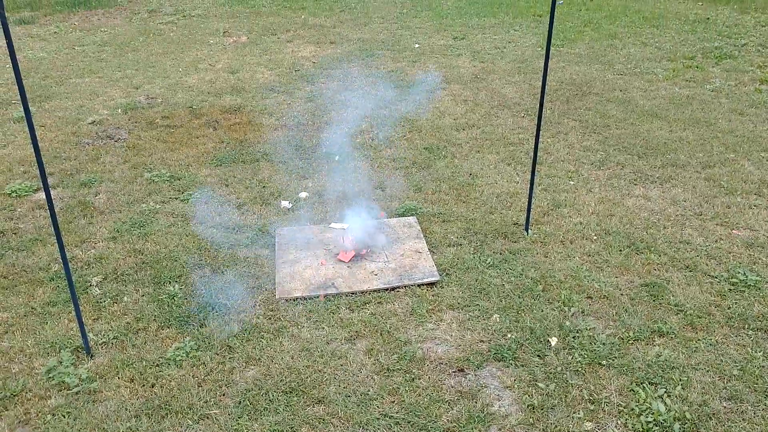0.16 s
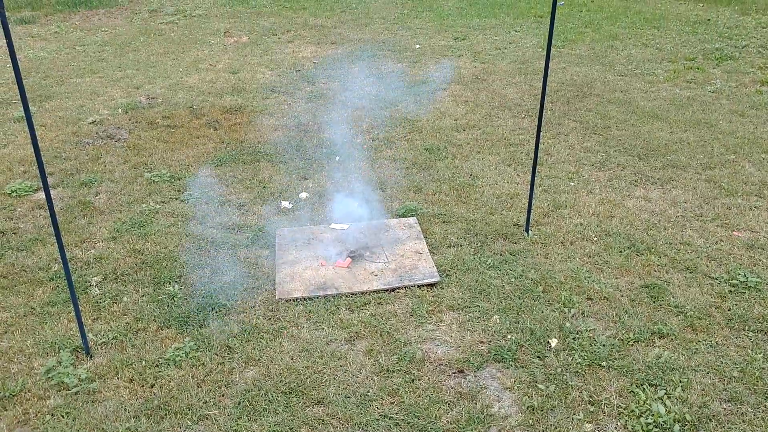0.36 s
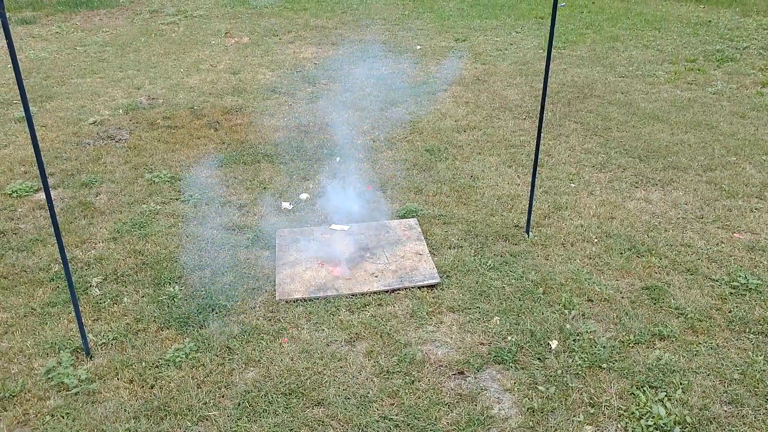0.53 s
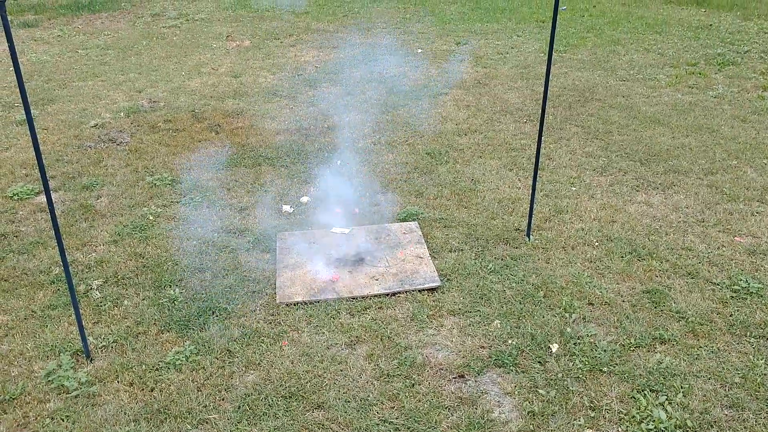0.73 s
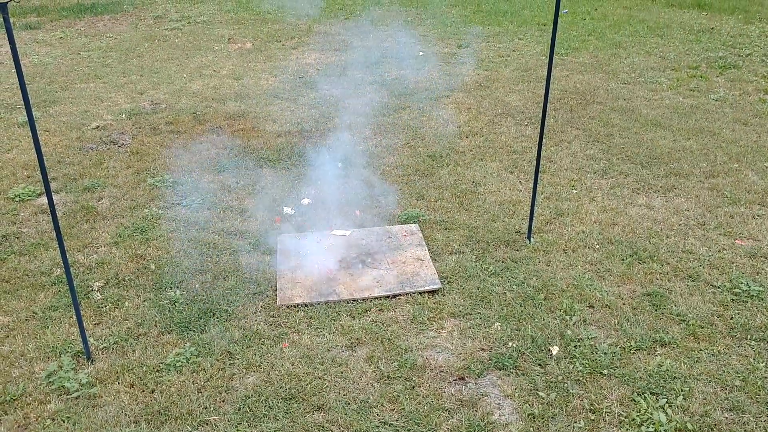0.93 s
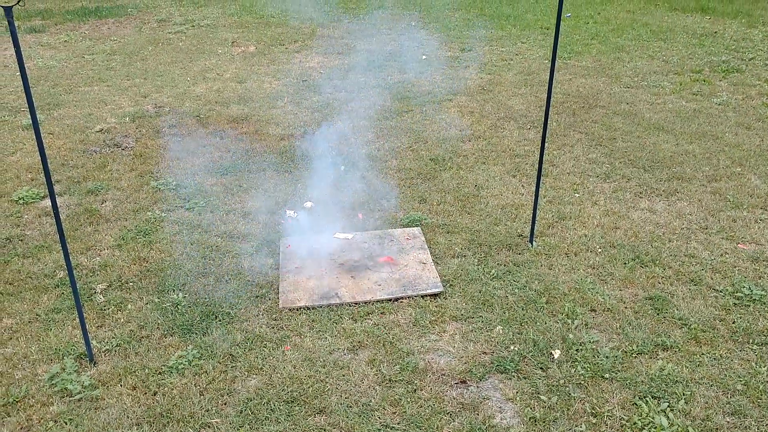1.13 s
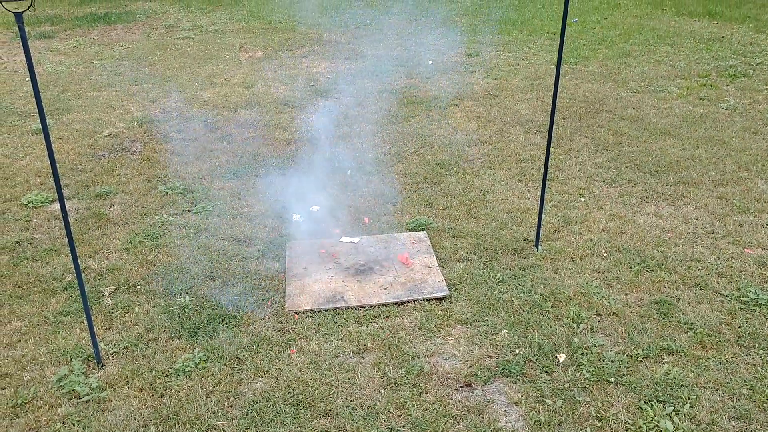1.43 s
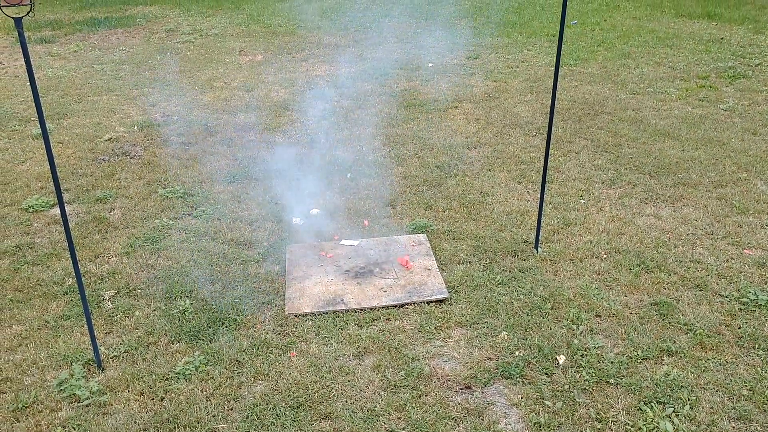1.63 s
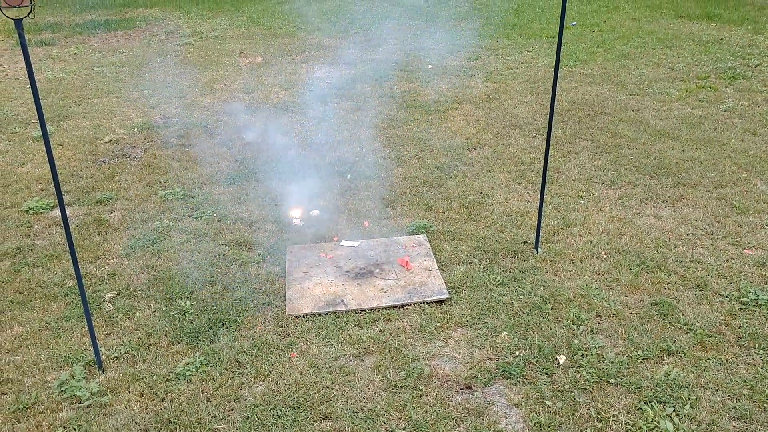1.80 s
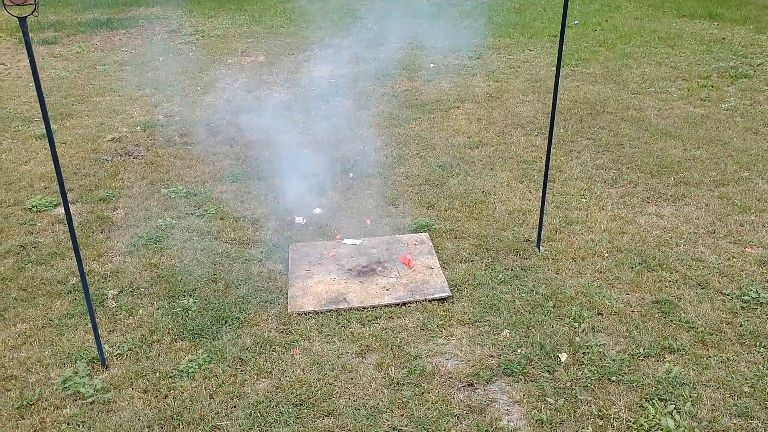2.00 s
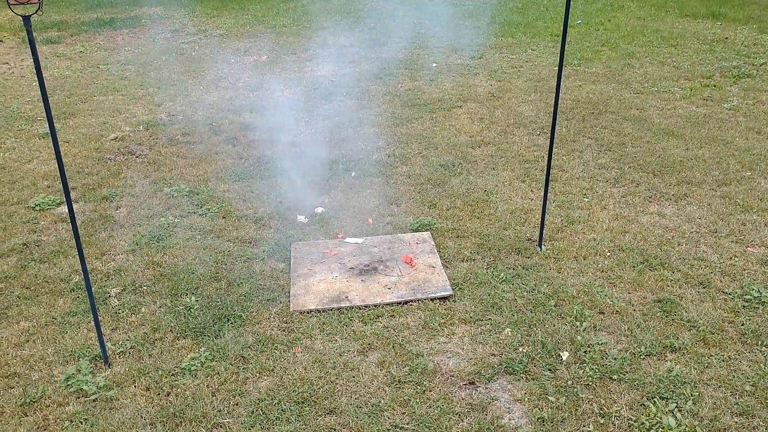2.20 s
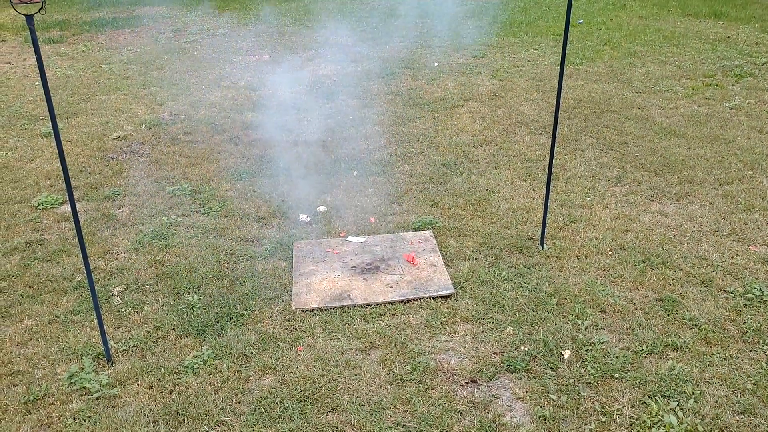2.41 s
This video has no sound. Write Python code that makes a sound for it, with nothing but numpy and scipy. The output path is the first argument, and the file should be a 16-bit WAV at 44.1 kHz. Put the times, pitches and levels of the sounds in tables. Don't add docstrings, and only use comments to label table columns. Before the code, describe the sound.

A ragged string of firecracker bangs outdoors, singles and tight doubles of varying loudness, each with a torn crackle and quick wall echoes; after the last bang the reverberation dies into quiet air. Wide stereo, peaks clipping.

```python
import sys
import numpy as np
from scipy import signal
from scipy.fft import rfft, irfft, next_fast_len
from scipy.io import wavfile
from scipy.ndimage import uniform_filter1d

SR = 44100
rng = np.random.default_rng(int(sys.argv[2]) if len(sys.argv) > 2 else 0)


def store_wav(level_fs):
    pcm = np.round(np.clip(np.atleast_2d(level_fs), -1, 1) * 32767)
    wavfile.write(sys.argv[1], SR, pcm.T.astype(np.int16))


def makeup_ratio(level_db):
    decades = np.asarray(level_db, float) / 20
    return 10 ** decades


N = 112454
LEAD = 4410

# (time [s], shock peak [dB], crackle re shock [dB], true strength carried by the echoes [dB])
BANG_EVENTS = [(0.2333, -17, 2.5, -5), (0.2409, -19, 7.5, -2.5), (0.367, -9, -2.5, 0.5),
               (0.4854, -12.5, 1, -1), (0.5418, -13.5, -3.5, -2.5), (0.5597, -11.5, -4, 1),
               (0.6279, -14, 0.5, 3.5), (0.6568, -17.5, 6.5, 4), (0.8122, -1.5, -7.5, 6.5),
               (0.9562, -7, -2.5, -12), (0.9704, -14, -2.5, 1), (0.9969, -15.5, -3, 0),
               (1.0229, -20, 8, 1.5), (1.2414, -9, -6.5, -0.5), (1.2634, -4, -9, -4.5),
               (1.5021, -10, -0.5, -0.5), (1.7989, -27.5, 20, 2), (1.811, -4.5, -13, -4),
               (1.9323, -6.5, -8, -16.5), (2.0007, -5.5, -8.5, -9.5)]
# (time [s], shock peak [dB], crackle re shock [dB], true strength [dB])
EARLIER_BANG = [
    (-.029, -5, -6, 3.5),
]
ALL_BANGS = list(EARLIER_BANG) + list(BANG_EVENTS)
# (frequency [Hz], density [dB per Hz])
CRACKLE_SPECTRUM = [(100, -23.5), (350, 0.5), (800, 0), (2000, -3.5), (3500, -7.5), (6000, -8.5),
                    (10000, -10.5), (16000, -4)]
# (frequency [Hz], likeness [0-1])
PORT_LIKENESS = [(200, .9), (700, 0.41), (1500, .1), (3000, 0.065), (15000, .05)]


def at_hz(points, hz):
    points = np.array(points)
    return np.interp(np.log(np.maximum(hz, 1)), np.log(points[:, 0]), points[:, 1])


def rms_one(x):
    return x / np.sqrt(np.mean(x ** 2) + 1e-20)


def colour(x, spectrum):
    size = x.shape[-1]
    hz = np.arange(size // 2 + 1) * SR / size
    return rms_one(irfft(rfft(x) * makeup_ratio(at_hz(spectrum, hz)), size))


def band(x, low_hz, high_hz):
    return signal.sosfilt(signal.butter(2, [low_hz, high_hz], "band", fs=SR, output="sos"), x)


def add(track, s, sound):
    i = int(round(s * SR)) + LEAD
    track[..., i:i + sound.shape[-1]] += sound[..., :track.shape[-1] - i]


def drift(rate_hz, size):
    r = np.exp(-2 * np.pi * rate_hz / SR)
    return rms_one(signal.lfilter([1], [1, -2 * r, r * r], rng.standard_normal(size + SR))[SR:])


def ports(white):
    alike = np.clip(at_hz(PORT_LIKENESS, np.arange(513) * SR / 1024), 0, 1)
    bins = rfft(white)
    return irfft(np.sqrt(alike) * bins[0] + np.sqrt(1 - alike) * bins[1:])


def shock(t):
    length_s = 0.00068
    return np.clip(t * SR + 1, 0, 1) * (t < length_s) * (1 - 2 * t / length_s)


def wind():
    port_db = np.array([[-68], [-77]])
    low = band(rng.standard_normal((2, N)), 40, 150)
    gusts = makeup_ratio(7.2 * np.array([drift(6, N), drift(6, N)]))
    return makeup_ratio(port_db) * rms_one(low) * gusts


def garden():
    # (frequency [Hz], density [dB per Hz])
    scatter_spectrum = [(200, 0.5), (700, -4), (1500, -10.5), (3000, -6), (6000, -14.5), (15000, -17.5)]
    # (frequency [Hz], density [dB per Hz])
    tail_spectrum = [(100, -19.5), (300, -11), (700, -12.5), (1500, -10.5), (3000, -5), (6000, -10.5),
                     (15000, -9.5)]
    # (frequency [Hz], T60 [s])
    tail_decay = [(200, 1.3), (800, 1.88), (3000, 0.85), (8000, 0.62), (15000, 0.37)]
    # (frequency [Hz], density [dB per Hz])
    air_spectrum = [(60, 15), (200, -13), (700, 3), (2000, -9.5), (5000, -16.5), (15000, -21)]
    scatter_db, scatter_end_s, scatter_t60_s = -27, 0.034, 0.23
    tail_db, tail_rise_s, air_db, patchy_db = -39.5, 0.024, -66, 0.5

    size = N + LEAD
    power = np.zeros(size)
    for s, _, _, true_db in ALL_BANGS:
        add(power, s, makeup_ratio(2 * true_db) * np.ones(1))

    t = np.arange(8000) / SR
    shape = makeup_ratio(-120 * t / scatter_t60_s) * np.clip(t / 0.0032, 0, 1) / (1 + (t / scatter_end_s) ** 16)
    near = np.maximum(signal.fftconvolve(power, shape)[:size], 0)

    rise = np.exp(-1 / (tail_rise_s * SR))
    edges = 40 * 2 ** np.arange(0, 9.1, .5)
    white = rng.standard_normal((2, 2, size))
    out = 0
    for k, (low, high) in enumerate(zip(edges, edges[1:])):
        mid, side = band(white[k % 2], low, high)
        hz = np.sqrt(low * high)
        fall = makeup_ratio(-120 / at_hz(tail_decay, hz) / SR)
        far = signal.lfilter([1 - rise], np.convolve([1, -rise], [1, -fall]), power)
        level = near * makeup_ratio(2 * (scatter_db + at_hz(scatter_spectrum, hz)))
        level = level + far * makeup_ratio(2 * (tail_db + at_hz(tail_spectrum, hz)))
        level = level + makeup_ratio(2 * (air_db + at_hz(air_spectrum, hz)))
        gain = 3 * np.sqrt(np.abs(level)) * makeup_ratio(patchy_db * drift(18, size))
        alike = np.clip(at_hz(PORT_LIKENESS, hz), -.99, .99)
        out = out + gain * (np.sqrt(1 + alike) * mid + np.sqrt(1 - alike) * side * [[1], [-1]])
    return out[:, LEAD:]


def slaps():
    # (time [s], peak [dB], dullness [Hz], left-right balance [dB])
    wall_slaps = [(0.017, -21.5, 11000, -4), (0.091, -20, 11000, -6), (0.287, -40, 11000, 3),
                  (0.414, -39, 11140, 0.0), (0.533, -31, 11000, 18), (0.86, -14, 11000, -5),
                  (0.893, -50, 11000, -20), (1.07, -13.5, 11000, -12.5), (1.104, -43, 11020, -6),
                  (1.141, -32, 11000, -6), (1.32, -17.5, 11000, 2), (1.324, -19, 11000, -6.5),
                  (1.548, -18, 11000, 11), (1.583, -34.5, 10800, 3), (1.617, -21.5, 11000, -8),
                  (1.844, -32.5, 11000, -8), (1.852, -16, 11020, 7), (1.977, -14, 10960, -3),
                  (2.047, -26.5, 11000, 1.5), (2.119, -29.5, 11200, 12), (2.223, -43, 11000, -2.5)]
    puff_s, trim_db = .0008, -9
    out, t = np.zeros((2, N + LEAD)), np.arange(1024) / SR
    for s, db, dull_hz, pan_db in wall_slaps:
        noise = colour(ports(rng.standard_normal((3, 1024))), CRACKLE_SPECTRUM)
        puff = noise * np.exp(-t / puff_s) + shock(t)
        dull = band(puff, 400, min(dull_hz, 18000))
        balance_db = np.clip([[pan_db], [-pan_db]], -5, 5) / 2
        add(out, s + .001, makeup_ratio(db + trim_db + balance_db) * dull)
    return out[:, LEAD:]


def lurches():
    # (time [s], signed height [full scale], time to the swing back [s])
    port_shoves = [(0.2347, 0.15, 0.0023), (0.2441, 0.15, 0.0019), (0.3687, 0.26, 0.003),
                   (0.4899, 0.17, 0.003), (0.5436, -0.25, 0.0023), (0.5613, 0.19, 0.0017),
                   (0.6327, 0.2, 0.0018), (0.6585, -0.17, 0.0027), (0.813, -0.12, 0.003),
                   (0.957, -0.13, 0.0021), (0.972, 0.25, 0.002), (0.9981, 0.08, 0.003),
                   (1.0235, 0.09, 0.003), (1.2432, 0.12, 0.0015), (1.2653, 0.21, 0.0015),
                   (1.5031, 0.36, 0.0023), (1.8, 0.15, 0.003), (1.8112, 0.17, 0.0023),
                   (1.9336, -0.23, 0.003), (2.0012, -0.09, 0.0017)]
    level_db, shared = -0.5, .5
    out = np.zeros((2, N + LEAD))
    for s, height, swing_s in port_shoves:
        t = (np.arange(800) - 200) / SR / swing_s
        push = np.exp(-(t / .5) ** 2) - .8 * np.exp(-((t - 1) / .55) ** 2)
        add(out, s - 195 / SR, makeup_ratio(level_db) * height * push * [[shared + 1], [shared - 1]])
    return out[:, LEAD:]


def blasts():
    # (delay [s], level [dB], dullness [Hz], left-right balance [dB])
    wall_echoes = [
        (0.019, -15.5, 5000, -8.5),
        (0.0205, -14.5, 4000, -0.5),
    ]
    port_lag_s, bounce_s, bounce_db = .0001, 0.002665, -8.5
    hold_s, fall_s, lumpy_db = .0042, .001, 4.5
    crack_s, crack_db = .00035, -2.5
    weak_dull_hz = 31100
    echo_wander_s, echo_length_s = .0003, .0011

    out, t = np.zeros((2, N + LEAD)), np.arange(1024) / SR
    late = t - np.array([[0], [port_lag_s]])
    waves = shock(late) + makeup_ratio(bounce_db) * shock((late - bounce_s) / 1.9)
    crack = makeup_ratio(crack_db) * np.exp(-np.abs(late) / crack_s)
    for s, db, crackle_db, true_db in ALL_BANGS:
        white, chance = rng.standard_normal((4, 1024)), rng.standard_normal((len(wall_echoes), 2))
        smooth = uniform_filter1d(uniform_filter1d(white[3], size=20), size=20)
        lumps = makeup_ratio(lumpy_db * rms_one(smooth))
        hold = makeup_ratio(crackle_db) * lumps * np.exp(-np.maximum(late - hold_s, 0) / fall_s)
        crackle = colour(ports(white[:3]), CRACKLE_SPECTRUM)
        top_hz = min(weak_dull_hz * makeup_ratio(2 * true_db), 18000)
        body = signal.lfilter(*signal.butter(1, top_hz, fs=SR), crackle)
        add(out, s, makeup_ratio(db) * (waves + (late >= 0) * (hold * body + crack * crackle)))

        smear = np.exp(-(t / echo_length_s - 1.2) ** 2) * crackle
        for (lag, echo_db, dull_hz, pan_db), (wander, swing) in zip(wall_echoes, chance):
            dull = band(smear + 0.28 * waves, 350, dull_hz)
            sides = makeup_ratio(true_db + echo_db + swing + np.array([[pan_db], [-pan_db]]) / 2)
            add(out, s + lag + echo_wander_s * wander, sides * dull)
    return out[:, LEAD:]


def scene():
    facing = makeup_ratio(np.array([[0], [1]]))
    return wind() + (garden() + blasts()) * facing + slaps() + lurches()


def roll_off(x):
    return signal.sosfilt(signal.butter(12, 17040, fs=SR, output="sos"), x)


def record(dry):
    # (frequency [Hz], share of the other port [0-1])
    cross_share = [(300, 0.33), (1000, 0.23), (2000, 0.6), (4200, 0.48), (6300, 0.23), (8500, 0.1),
                   (12000, 0.2), (15000, 0.2)]
    cross_samples, overload = 21.5, 1.0
    size = next_fast_len(N + 2048)
    hz = np.arange(size // 2 + 1) * SR / size
    bins = rfft(dry, size)
    cross = np.clip(at_hz(cross_share, hz), 0, 1) * np.exp(-2j * np.pi * hz * cross_samples / SR)
    both = irfft(bins - cross * bins[::-1], size)[:, :N]
    both = signal.sosfilt(signal.butter(1, 92, "high", fs=SR, output="sos"), both)
    both = both / (1 + np.abs(both / overload) ** 4) ** .25
    both = signal.sosfilt(signal.cheby2(10, 45, 16540, fs=SR, output="sos"), both)
    return roll_off(both)


dry = scene()
out = record(dry)
store_wav(out)
```